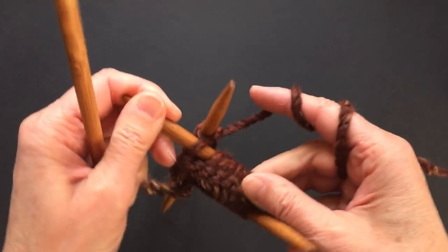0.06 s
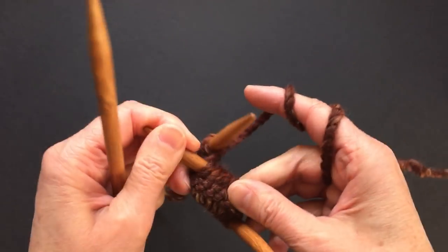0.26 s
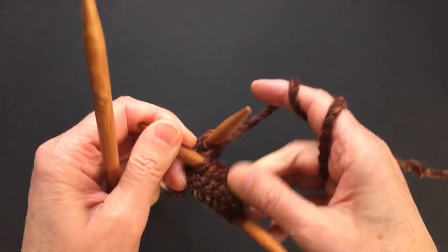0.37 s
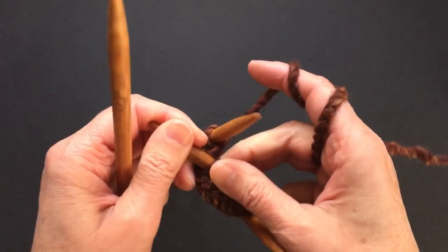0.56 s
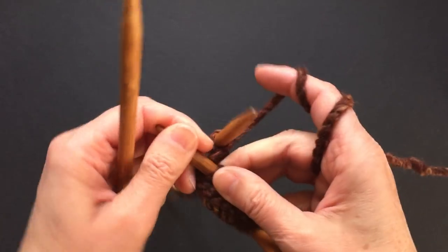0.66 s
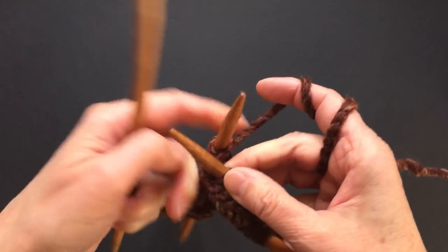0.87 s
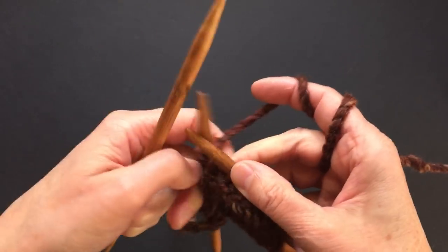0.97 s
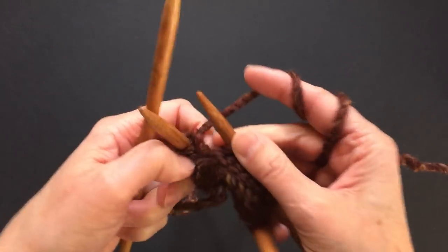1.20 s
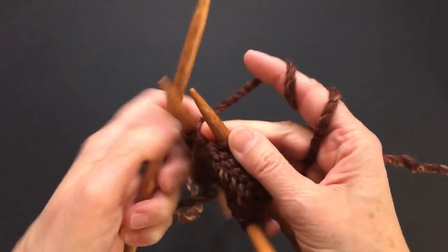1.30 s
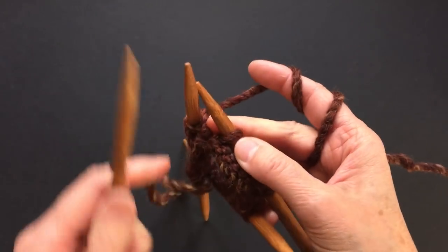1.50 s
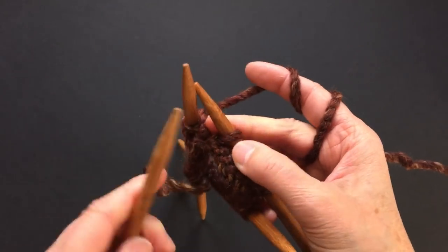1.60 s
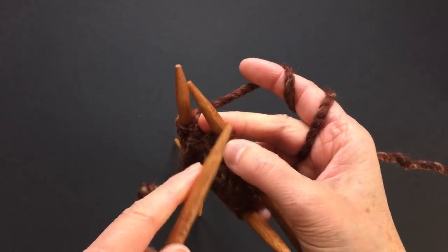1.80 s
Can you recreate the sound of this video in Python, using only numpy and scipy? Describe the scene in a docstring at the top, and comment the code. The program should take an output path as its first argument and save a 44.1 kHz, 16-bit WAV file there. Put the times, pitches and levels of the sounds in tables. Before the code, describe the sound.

Wooden knitting needles click and rub together, close to the microphone: paired knocks with a faint wool hiss first, a sharper cluster midway, light tip ticks, then more knocks and scrapes in a quiet small room.

```python
"""Shafts of two thick wooden knitting needles knock and chatter close to the microphone, over a table.
Knocks are filtered impulses, rubs are band-passed slip noise; a faint short ring colours both.
Tips tick, slide and squeak through higher resonances; one shaft briefly sings as an unsteady sine.
Wool hisses as grainy noise; hands bump softly as low noise bursts.
A quiet room adds reflections, a short tail, coloured air noise and a low wavering hum."""
import sys
import numpy as np
from scipy import signal
from scipy.fft import rfft, irfft
from scipy.io import wavfile
from scipy.ndimage import map_coordinates

SR = 44100
rng = np.random.default_rng(int(sys.argv[2]) if len(sys.argv) > 2 else 0)


def store_wav(level_fs):
    """Save 16-bit WAV to argv[1]."""
    pcm = np.round(np.clip(np.atleast_2d(level_fs), -1, 1) * 32767)
    wavfile.write(sys.argv[1], SR, pcm.T.astype(np.int16))


N = 81585
T = np.arange(N) / SR


def from_db(db):
    """Decibels to gain."""
    return 10 ** (np.asarray(db) / 20)


def rms_one(x):
    """Scale to unit power."""
    return x / np.sqrt(np.mean(x ** 2) + 1e-20)


def peak_at(x, db):
    """Scale to a peak level."""
    return from_db(db) * x / np.abs(x).max()


def filtered(x, hz, kind, order=2):
    """Causal Butterworth filter."""
    return signal.sosfilt(signal.butter(order, hz, kind, fs=SR, output="sos"), x)


def white():
    """White noise of unit variance."""
    return rng.standard_normal(N)


def noise(spectrum):
    """Noise of a given colour and unit power, interpolated in dB over log frequency."""
    hz, db = np.transpose(spectrum)
    bins_hz = np.maximum(np.fft.rfftfreq(N, 1 / SR), 1)
    gain = from_db(np.interp(np.log(bins_hz), np.log(hz), db))
    return rms_one(np.fft.irfft(np.fft.rfft(white()) * gain, N))


def wander(top_hz):
    """Low-passed random curve of unit power."""
    return rms_one(filtered(white(), top_hz, "low"))


def wavering_sine(hz):
    """Sine of unit power following a pitch curve."""
    return np.sqrt(2) * np.sin(2 * np.pi * np.cumsum(hz) / SR)


def impulse(s):
    """One instant of contact."""
    return signal.unit_impulse(N, int(s * SR))


def resonate(x, modes, pitch=1):
    """Parallel resonances of alternating sign, each applied twice for deep valleys between them."""
    out = 0
    for k, (hz, width_hz, db) in enumerate(modes):
        r = np.exp(-np.pi * width_hz / SR)
        w = 2 * np.pi * hz * pitch / SR
        section = [(1 - r * r) / 2, 0, (r * r - 1) / 2, 1, -2 * r * np.cos(w), r * r]
        out = out + (-1) ** k * from_db(db) * signal.sosfilt([section, section], x)
    return out


def friction(slips_per_s, spread_db, grain):
    """Random slips of uneven size and sign on a bed of fine grain."""
    sizes = from_db(spread_db * np.minimum(rng.exponential(1, N), 2)) * rng.choice([-1, 1], N)
    slips = sizes * (rng.random(N) < slips_per_s / SR)
    return rms_one(slips) + grain * white()


def stroke(s, length_s, db, attack_s=0.0087, release_s=0.0042):
    """Pressure of a stroke: quick linear attack, hold, exponential release."""
    attack = np.clip((T - s) / attack_s + .5, 0, 1)
    release = np.exp(-np.maximum(T - s - length_s, 0) / release_s)
    return from_db(db) * attack * release


def swell(s, length_s, db, ease_s=0.0069):
    """Pressure of a light touch: eases in and out."""
    rise = (1 + np.tanh((T - s) / ease_s)) / 2
    fall = (1 - np.tanh((T - s - length_s) / ease_s)) / 2
    return from_db(db) * rise * fall


def pressed(x, pressure):
    """Friction sound whose power follows the pressure of one stroke."""
    pushed = x * pressure
    return pushed * np.sqrt(np.sum(pressure ** 2) / np.sum(pushed ** 2))


# level of the hum: (time [s], level [dB])
HUM_LEVELS = [(0.0, -83), (0.085, -65.5), (0.406, -78), (0.54, -60), (0.742, -71), (0.834, -62.5),
              (1.163, -78), (1.362, -57), (1.52, -79.5), (1.57, -61), (1.792, -68.5), (1.85, -82)]


def hum(pitch_hz=117.7, waver_hz=2.6):
    """Low hum of the room: a sine wavering in pitch and level."""
    s, db = np.transpose(HUM_LEVELS)
    hz = pitch_hz + waver_hz * wander(8)
    return from_db(np.interp(T, s, db)) * wavering_sine(hz)


# colour of the room's air: (frequency [Hz], level per Hz [dB])
AIR_SPECTRUM = [(35, -32), (58, -10), (75, -15.5), (110, -9), (145, -5), (190, 0), (260, -15), (360, -9),
                (500, -21.5), (750, -24.5), (1500, -29), (2200, -29.5), (3500, -33.5), (6500, -36),
                (10000, -44), (15500, -48.5)]


def air(level_db=-67.5):
    """Air of the room: steady coloured noise."""
    return from_db(level_db) * noise(AIR_SPECTRUM)


# shafts rub: (time [s], length [s], level [dB], lower edge [Hz], upper edge [Hz], coarseness [0-1])
RUBS = [(0, 0.025, -66.5, 1870, 2400, 0), (0.25, 0.048, -48, 1790, 3200, 0.4),
        (0.307, 0.023, -53, 1870, 3200, 0.15), (0.335, 0.028, -47.5, 1920, 2940, 0.48),
        (0.368, 0.03, -60, 1950, 2480, .7), (0.477, 0.011, -49.5, 2230, 2830, 0.92),
        (0.744, 0.014, -44, 1870, 2890, 1), (0.758, 0.023, -39, 1800, 3050, 0.5),
        (0.871, 0.025, -63, 2025, 2630, 0.56), (1.285, 0.062, -78, 2120, 2440, 0.2),
        (1.348, 0.064, -43.5, 1780, 4300, 0.33), (1.413, 0.037, -60, 2310, 4740, 0.11),
        (1.595, 0.043, -66, 2140, 3300, 0.4)]
# lowest bending mode of a shaft, also heard in ticks: (frequency [Hz], width [Hz], level [dB])
LOW_MODE = [(1049, 350, 0)]


def rubs(low_cut_hz=1565, top_factor=1.59, low_mode_db=-27):
    """Shafts rub in stick and slip: coarse slips or fine grain, band-passed, plus the lowest mode."""
    slips = friction(slips_per_s=1800, spread_db=7.0, grain=0)
    grain = white()
    out = 0
    for s, length_s, db, low_hz, high_hz, coarse in RUBS:
        force = coarse * slips + (1 - coarse) * grain
        rub = filtered(force, low_cut_hz, "high", order=6)
        rub = filtered(rub, [low_hz, high_hz], "band")
        rub = rms_one(filtered(rub, high_hz * top_factor, "low", order=4))
        rub = rub + from_db(low_mode_db) * rms_one(resonate(force, LOW_MODE))
        out = out + pressed(rub, stroke(s, length_s, db))
    return out


# faint short ring colouring knocks and rubs: (frequency [Hz], level [dB], t60 [s])
RING_RESONANCES = [(1866, -48, 0.025), (2203, -50, 0.1), (2492, -49.5, 0.079), (2630, -78, 0.04),
                   (2975, -46, 0.035), (3300, -44, 0.075), (4300, -68.5, 0.06)]


def ring(contacts, spread_db=2):
    """Faint decaying resonances that colour each contact, fed by randomly drifting amounts."""
    out = 0
    for hz, db, t60_s in RING_RESONANCES:
        r, w = from_db(-60 / (t60_s * SR)), 2 * np.pi * hz / SR
        feed = from_db(db + spread_db * wander(8.8))
        out = out + signal.lfilter([1, -r * np.cos(w)], [1, -2 * r * np.cos(w), r * r], feed * contacts)
    return out


# shaft against shaft: (time [s], level [dB], lower edge [Hz], upper edge [Hz], contact cut-off [Hz])
# a harder contact has a higher cut-off
KNOCKS = [(0.0393, -42, 2080, 2580, 4200), (0.0455, -42.5, 2030, 3130, 4070),
          (0.2166, -24.5, 1610, 2700, 3900), (0.2775, -23.5, 1735, 3080, 3570),
          (0.4552, -38, 2236, 2590, 4200), (0.4822, -35.5, 2100, 2850, 3700),
          (0.485, -39, 2240, 2770, 3700), (0.699, -18, 1690, 2960, 3300), (.759, -32, 1530, 3020, 4040),
          (.768, -24.5, 1600, 2750, 3950), (0.8208, -21, 1770, 3100, 5930), (1.3424, -26, 1830, 4240, 6500),
          (1.387, -28, 1710, 3200, 6270), (1.5684, -20.5, 1570, 3690, 5500)]
# upper bending mode of a knocked shaft: (frequency [Hz], width [Hz], level [dB])
OVERTONE = [(4360, 52, 0)]


def knocks(low_cut_hz=1310, overtone_db=-38.5):
    """Shafts knock, heavily damped by the fingers: band-passed impulses plus a faint upper mode."""
    out = 0
    for s, db, low_hz, high_hz, contact_hz in KNOCKS:
        contact = filtered(impulse(s), contact_hz, "low", order=8)
        contact = filtered(contact, low_cut_hz, "high", order=3)
        out = out + peak_at(filtered(contact, [low_hz, high_hz], "band"), db)
        out = out + peak_at(resonate(impulse(s), OVERTONE), db + overtone_db)
    return out


# wool drawn along a needle: (time of peak [s], rise [s], fall [s], level [dB])
PULLS = [(0.195, 0.01, 0.022, -67), (0.299, 0.046, 0.033, -43)]
# colour of the hiss: (frequency [Hz], level per Hz [dB])
WOOL_SPECTRUM = [(1500, -23), (3000, 4), (4500, -1.5), (7000, 1), (11000, 1), (15500, -1.5)]


def wool(catch_db=2.0, catch_hz=280):
    """Countless fibres catch and let go: a grainy bright hiss that swells and fades with each pull."""
    speed = 0
    for s, rise_s, fall_s, db in PULLS:
        width_s = np.where(T < s, rise_s, fall_s)
        speed = speed + from_db(db) * np.exp(-((T - s) / width_s) ** 2)
    catches = from_db(catch_db * wander(catch_hz))
    return speed * rms_one(catches * noise(WOOL_SPECTRUM))


# tip against shaft: (time [s], level [dB], pitch factor of the tip modes [1],
#                     frequency the contact fails to excite [Hz], relative level of the lowest mode [dB])
TICKS = [(0.4544, -48, 0.83, 5630, -32), (1.068, -30, 1.035, 5500, -51), (1.135, -28.5, 0.91, 3430, -30),
         (1.452, -35, 0.94, 8200, -35), (1.4703, -44, 0.856, 2880, -42)]
# resonances of the points, also heard in slides: (frequency [Hz], width [Hz], level [dB])
TIP_MODES = [(2366, 650, 1), (3200, 1270, -3.5), (4650, 600, 3), (6436, 1030, -3), (7150, 1000, -14.5),
             (8200, 320, -7.5), (9330, 260, -16.5), (13200, 890, -15)]
TIP_LOW_CUT_HZ = 1800


def ticks(top_hz=11000, notch_q=1.9):
    """Tips tick: impulses through the tip resonances, notched by the point of contact."""
    out = 0
    for s, db, pitch, missed_hz, low_db in TICKS:
        notch_b, notch_a = signal.iirnotch(missed_hz, notch_q, SR)
        tick = signal.lfilter(notch_b, notch_a, resonate(impulse(s), TIP_MODES, pitch))
        tick = filtered(filtered(tick, TIP_LOW_CUT_HZ, "high"), top_hz, "low", order=4)
        out = out + peak_at(tick, db)
        out = out + peak_at(resonate(impulse(s), LOW_MODE, pitch), db + low_db)
    return out


# hands bump: (time [s], length [s], level [dB], lower edge [Hz], upper edge [Hz])
BUMPS = [(0.697, 0.012, -56, 270, 453), (0.813, 0.015, -55.5, 167, 390), (1.339, 0.015, -54.5, 327, 530),
         (1.335, 0.033, -53.5, 115, 276), (1.375, 0.042, -61.5, 127, 543), (1.567, 0.013, -54.5, 69.6, 353),
         (1.745, 0.022, -58.5, 97, 212)]


def hands():
    """Dull bumps of the fingers and the knitting: band-passed noise bursts."""
    force, out = white(), 0
    for s, length_s, db, low_hz, high_hz in BUMPS:
        band_gain = np.sqrt(SR / 2 / (high_hz - low_hz))  # makes up for the power outside the band
        push = force * stroke(s, length_s, db) * band_gain
        out = out + filtered(push, [low_hz, high_hz], "band", order=3)
    return out


def glided(x, s, length_s, pitch, rise_per_s=1.6):
    """Resample so that the resonances climb during a slide, as the contact nears the point."""
    speed = pitch * (1 + rise_per_s * np.clip(T - s, 0, length_s))
    return map_coordinates(x, [np.cumsum(speed)], mode="mirror")


# tip slides along a shaft: (time [s], length [s], level [dB], pitch factor of the tip modes [1])
SLIDES = [(0.76, 0.025, -51, 0.98), (1.069, 0.05, -58, 1), (1.129, 0.0092, -50.5, 0.94),
          (1.351, 0.07, -57, 0.86), (1.456, 0.011, -53.5, 1.02), (1.469, 0.036, -64.5, 1.08)]


def slides(slips):
    """Tips slide: slips excite the tip resonances, which climb during each stroke."""
    sliding = filtered(resonate(slips, TIP_MODES), TIP_LOW_CUT_HZ, "high")
    out = 0
    for s, length_s, db, pitch in SLIDES:
        out = out + pressed(glided(sliding, s, length_s, pitch), stroke(s, length_s, db))
    return out


# tip squeaks on the polished wood: (time [s], length [s], level [dB])
SQUEAKS = [(0.771, 0.017, -60), (1.028, 0.027, -76), (1.116, 0.029, -69.5), (1.345, 0.075, -63.5),
           (1.467, 0.01, -60), (1.633, 0.028, -53), (1.765, 0.06, -84)]
# resonances of a squeak: (frequency [Hz], width [Hz], level [dB])
SQUEAK_MODES = [(6813, 152, -1.5), (9490, 364, 2), (11320, 450, -17.5), (12170, 380, -5.5),
                (13400, 570, -11), (15380, 620, -10.5)]


def squeaks(slips):
    """Tips squeak: slips under a light touch excite narrow high resonances."""
    squeaking = resonate(slips, SQUEAK_MODES)
    return sum(pressed(squeaking, swell(s, length_s, db)) for s, length_s, db in SQUEAKS)


# a shaft sings: (time [s], length [s], level [dB])
SING = (1.49, .014, -57.5)


def singing(pitch_hz=2150, wobble_hz=45):
    """A shaft briefly sings as it sticks and slips at one unsteady pitch."""
    hz = pitch_hz + wobble_hz * wander(300)
    return stroke(*SING) * wavering_sine(hz)


# reflections from table and hands: (delay [s], gain [1])
REFLECTIONS = [(.00109, .15), (.00152, .14), (.00197, .27), (.00277, .11), (.00374, .11), (.0079, .12)]


def room(x, t60_s=0.15, tail_db=-15, top_hz=5700, onset_s=0.0036):
    """Near reflections, then a short diffuse tail of decaying noise."""
    near = sum(gain * np.interp(T - s, T, x, left=0) for s, gain in REFLECTIONS)
    decay = np.exp(-np.log(1000) * T / t60_s)
    tail = filtered(white(), top_hz, "low", order=1) * decay * np.minimum(T / onset_s, 1) ** 2
    tail = tail / np.sqrt(np.sum(tail ** 2))
    return x + near + from_db(tail_db) * signal.fftconvolve(x, tail)[:N]


def scene():
    """Needles, wool and hands in the room, over its hum and air."""
    contacts = rubs() + knocks()
    shafts = contacts + ring(contacts) + singing()
    tip_slips = friction(slips_per_s=1000, spread_db=3.5, grain=0.93)
    tips = ticks() + slides(tip_slips) + squeaks(tip_slips)
    return (room(shafts + tips + wool() + hands()) + hum() + air())[None]


def record(dry, cutoff_hz=15750):
    """Steep elliptic low-pass."""
    return signal.sosfilt(signal.ellip(12, .1, 80, cutoff_hz, fs=SR, output="sos"), dry)


dry = scene()
out = record(dry)
store_wav(out)
```